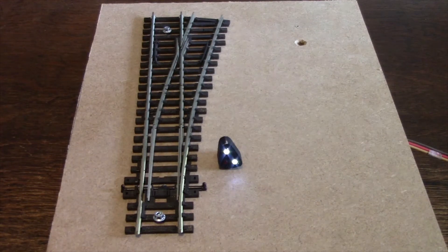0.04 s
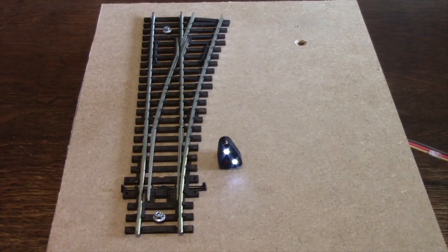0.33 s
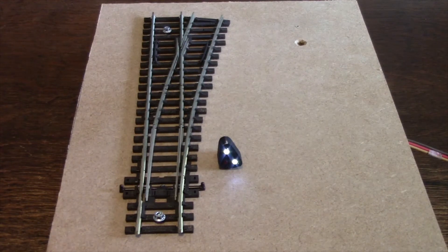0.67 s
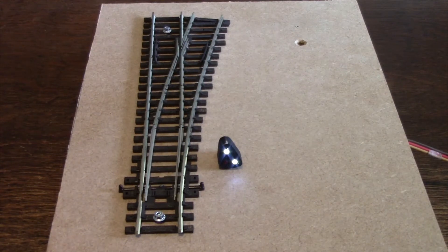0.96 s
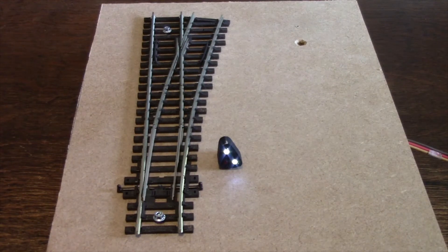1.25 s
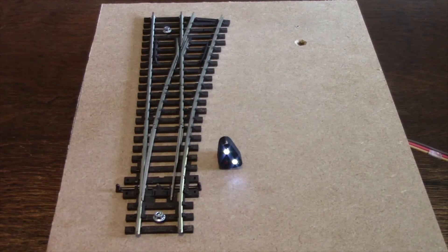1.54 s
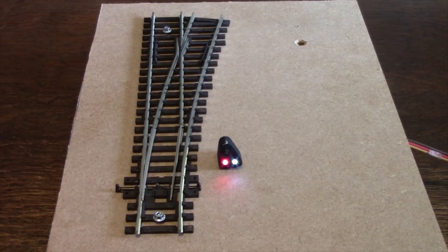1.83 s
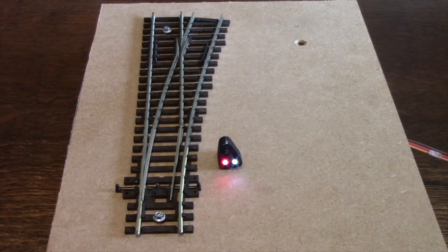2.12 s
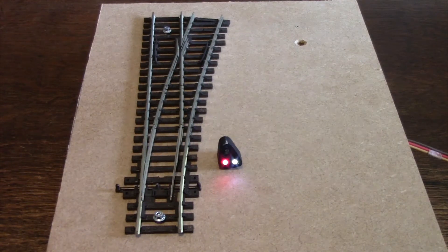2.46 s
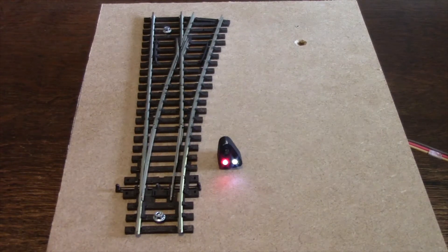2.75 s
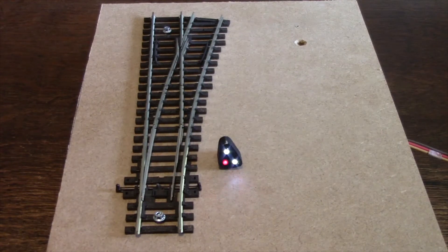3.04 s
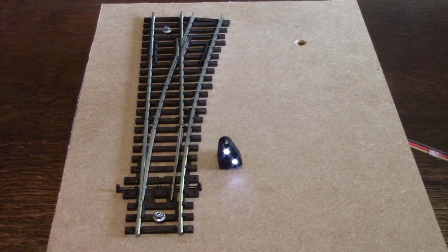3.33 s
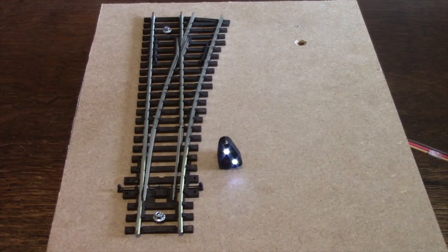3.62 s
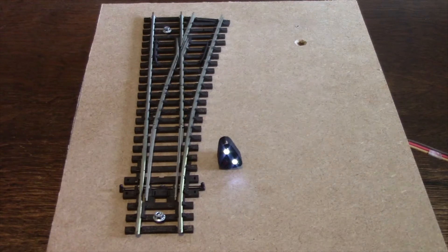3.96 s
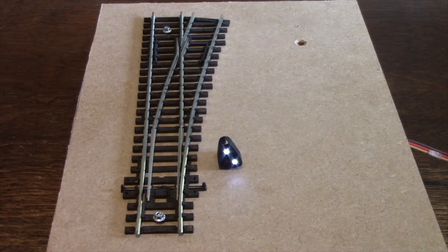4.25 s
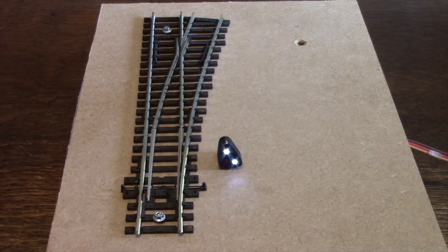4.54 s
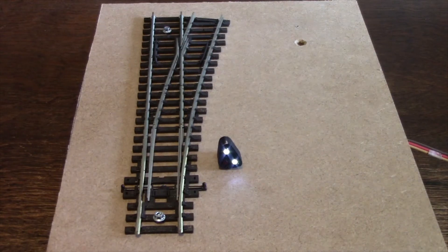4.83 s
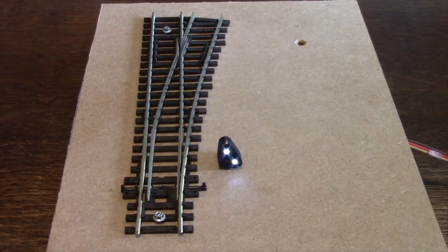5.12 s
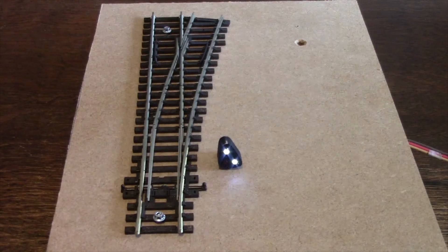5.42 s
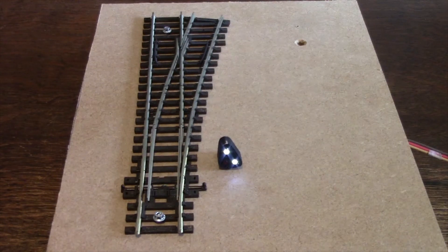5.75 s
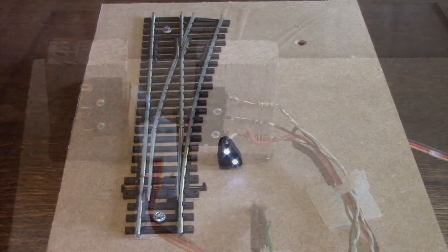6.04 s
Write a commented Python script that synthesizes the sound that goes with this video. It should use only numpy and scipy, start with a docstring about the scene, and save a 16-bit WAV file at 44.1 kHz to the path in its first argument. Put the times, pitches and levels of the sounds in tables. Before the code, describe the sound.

In a quiet, faintly humming room, a little servo motor starts a fine, rattling gear whirr close to the microphone, sliding a model track point over. Two bright microswitch clicks mark the trip. The buzz turns more even as the motor stalls, then limps on again for the return, with a brief rail scrape and two more clicks. It stops, leaving small gear twitches, one soft baseboard tick and faint camera lens chirps.

```python
"""A small servo, close to a stereo pair of microphones, creeps a model railway point across, strains
against its end stop, then creeps back. Its motor is kicked once per control frame, about 42 times a
second, so the gears strike and ring the case; two microswitches snap over on each trip. The baseboard
nods as the arm sets off and later ticks once. Close by, a camera's lens drive chirps now and then;
behind it all lie the rumble and hum of a quiet room."""
import sys
import numpy as np
from scipy import signal
from scipy.fft import rfft, irfft
from scipy.io import wavfile
from scipy.ndimage import uniform_filter1d

SR = 44100
rng = np.random.default_rng(int(sys.argv[2]) if len(sys.argv) > 2 else 0)


def to_wav(sig):
    """Store sig (one row per channel, or 1-D mono) as 16-bit WAV at the path in sys.argv[1].

    Samples outside -1..1 are clipped; the rate is SR.
    """
    pcm = np.clip(np.atleast_2d(sig), -1, 1) * 32767
    pcm = np.round(pcm).astype(np.int16)
    wavfile.write(sys.argv[1], SR, pcm.T)  # frames by channels


N = 268216
WINDUP_SAMPLES = 132  # the gears take up their slack for this long before they strike

# the arm's three moves: (start [s], end [s], travel [about -1 outward, 0 at the stop, 1 back],
# relative pulse level [dB], rubbing level [dB], extra push of a command step [dB])
MOVES = [(0.414, 1.608, -1.1, -35, -53.5, 4), (1.804, 2.94, -0.14, -31, -70, 0),
         (2.98, 4.296, 0.93, -33, -54.5, 1.5)]
# resonances of the servo's case and gears:
# (frequency [Hz], width [Hz], gain outward [dB], gain stalled [dB], gain back [dB])
CASE_MODES = [(1550, 156, -14, -16.5, -16), (2007, 175, -10, -9, -12), (2594, 360, -9, -7.5, -12.5),
              (3085, 125, 4, 5.5, 4), (3660, 220, -5, -24, 1), (3880, 180, -9.5, -4, -5.5),
              (4380, 56, -11, -7, -13), (4764, 68, -8.5, -14, -7.5), (5586, 470, -12, -10.5, -8),
              (6600, 295, -7, -13.5, -4), (7250, 260, -15, -17, -25), (7900, 120, -21, -16, -16),
              (8390, 700, -16, -15, -13), (9320, 270, -19.5, -14.5, -17.5), (9900, 430, -36, -20.5, -20),
              (11520, 500, -25, -31, -21.5), (12600, 540, -24, -27, -21.5), (14800, 1000, -39, -37, -34)]
# resonances of each switch and its mount: (frequency [Hz], width [Hz], gain outward [dB], gain back [dB])
SWITCH_MODES = [
    [(1180, 250, -1, -5), (1800, 80, 7, 4), (2320, 130, 17, 11.5), (3095, 240, 18.5, 12),
     (3350, 190, 10, 17.5), (4550, 240, -7, 1), (5700, 400, -1, 7.5), (6720, 400, 11.5, 6.5),
     (7800, 240, 10, 10), (8130, 160, 20.5, 14.5), (8700, 250, 17, 14), (9560, 340, 19, 13),
     (10900, 280, -11, 7.5), (13540, 390, 5, -3), (15700, 430, 3, -3)],
    [(1210, 260, 0, -2.5), (1584, 380, 8, 7), (2010, 58, -9, 16), (2690, 220, 21, 7), (3960, 110, 12.5, 11),
     (4280, 110, 10, 9), (5640, 510, 10.5, 8), (6630, 250, 19.5, -3), (7700, 350, 8, 1),
     (8400, 250, 12, 10), (9570, 250, 5, 15), (10720, 310, 8, 11.5), (11970, 260, 11, 14),
     (13650, 370, 6, 9), (14400, 370, 12, 8)],
]


def servo(pulse_db=-3, catch_db=-2.0, follow_db=2.5, uneven_db=3, step_frames=4,
          bite_db=6.5, bite_frames=0.83):
    """One motor kick per control frame: limping while the gears turn, more even while they are stalled."""
    # the gears catch hard: (time [s], relative level [dB], pitch rung most [Hz])
    catches = [(0.4564, -33, 3060), (0.7337, -29, 3080), (0.828, -27.5, 2930), (0.9206, -27.5, 3260),
               (.991, -31.5, 6600), (1.0143, -29.5, 6600), (1.1311, -28, 3000), (1.4382, -32.5, 3080),
               (1.578, -29.5, 3200), (1.6968, -30, 3080), (2.9768, -30, 3780), (3.2371, -30.5, 3700),
               (3.448, -29, 3470), (3.7052, -28, 3630), (3.8674, -29.5, 3700), (3.914, -28.5, 3700),
               (4.0066, -30, 3670), (4.1694, -28, 3800)]
    # frames with the arm already in place and no pulse: (time [s])
    rests = [.503, .665, .805, 1.108, 1.461, 1.674, 2.954, 3.355]
    same_teeth, out = rattle(0.00328, 5.9), np.zeros(N)
    since_catch, bite_hz = 1, 0
    for s in frame_times():
        since_catch += 1
        travel, db, _, step_db = arm_motion(s)
        turning = np.clip(abs(travel), .08, 1)
        db += pulse_db + step_db * (since_catch % step_frames == 0)  # the commanded position steps on
        db += turning * (follow_db * (since_catch == 1) + uneven_db * (2 * rng.random() - 1))
        for at, hard_db, hz in catches:
            if abs(at - s) < .01:
                s, db, bite_hz, since_catch = at, hard_db + catch_db, hz, 0
        impacts = (1 - turning) * same_teeth + turning * rattle(0.00311, 7.05)
        lift_db = bite_db * np.exp(-since_catch / bite_frames)  # the caught tooth stays in mesh briefly
        pulse = gear_pulse(impacts, np.clip(travel, -1, 1), bite_hz, lift_db)
        if np.min(abs(s - np.array(rests))) > .01:
            add(out, s - WINDUP_SAMPLES / SR, blow(pulse, db))
    return out


def frame_times():
    """The start of each control frame in seconds; the frames slow down as the arm takes load."""
    # (time [s], frame rate [Hz])
    frame_rate = [(.41, 43.33), (1.737, 42.155), (2.915, 42.155), (4.3, 43.54)]
    s, rate = np.transpose(frame_rate)
    t = np.arange(s[0], s[-1], 1 / SR)
    frames = np.floor(np.cumsum(np.interp(t, s, rate)) / SR - .003)
    return t[1:][np.diff(frames) > 0]


def arm_motion(s):
    """Travel, pulse level, rubbing and step push at time s: steady within a move, blending in between."""
    moves = np.array(MOVES)
    return [np.interp(s, moves[:, :2].ravel(), np.repeat(column, 2)) for column in moves.T[2:]]


def gear_pulse(impacts, travel, bite_hz, bite_db, bite_width_hz=730,
               windup_db=-9, windup_s=0.0061, vary_db=3):
    """The gears scrape as the motor takes up their slack, then strike and ring the case."""
    swell = np.exp(np.arange(-WINDUP_SAMPLES, 0) / SR / windup_s)
    scrape = rng.standard_normal(WINDUP_SAMPLES) * swell
    slack = .5 + .5 * abs(travel)  # stalled gears stay pressed together
    drive = np.r_[slack * amp(windup_db) * scrape / np.linalg.norm(scrape), impacts]
    modes = []
    for f, width, *levels in CASE_MODES:
        db = np.interp(travel, [-1, 0, 1], levels)  # each direction loads the other flank of the teeth
        db += vary_db * travel * rng.standard_normal()  # each new tooth colours the blow
        db += bite_db * np.exp(-((f - bite_hz) / bite_width_hz) ** 2)
        modes.append((f, width, db))
    return ring(drive, modes)


def gear_whirr(grain_db=3, grain_s=0.0018, fade_db_per_s=700):
    """The motor coasts and the teeth rub with a fine grit, which dies away when the arm is parked."""
    # spectrum of the rubbing: (frequency [Hz], relative density [dB])
    rub_colour = [(500, -9), (1300, -5.5), (2100, -8.5), (3300, 1), (4200, -2.5), (5200, -3.5),
                  (6600, -7.5), (8500, -10), (11000, -11), (16000, -25)]
    # the rails scrape as they slide back: (time [s], half length [s], extra rubbing [dB])
    rail_scrape = (3.28, 0.048, 9.2)
    at, half_length, scrape_db = rail_scrape
    t = np.arange(N) / SR
    _, _, rub_db, _ = arm_motion(t)
    parked_s = np.maximum(MOVES[0][0] - t, 0) + np.maximum(t - MOVES[-1][1], 0)
    db = rub_db + scrape_db * np.exp(-((t - at) / half_length) ** 2) - fade_db_per_s * parked_s
    grit = unit(uniform_filter1d(rng.standard_normal(N), int(grain_s * SR)))
    rub = rng.standard_normal(N) * amp(grain_db * grit)
    colour = amp(curve(rub_colour, np.fft.rfftfreq(N, 1 / SR)))
    return amp(db) * unit(irfft(rfft(rub) * colour, N))


def twitches(gain_db=-1.5):
    """Stray pulses jerk the gears of the parked servo."""
    # (time [s], relative level [dB])
    stray_pulses = [(4.6745, -31.5), (6.034, -36), (6.056, -33.5), (6.0787, -34.5)]
    out = np.zeros(N)
    for s, db in stray_pulses:
        jerk = gear_pulse(rattle(0.00345, 6.6), travel=0.73, bite_hz=3900, bite_db=2)
        add(out, s - WINDUP_SAMPLES / SR, blow(jerk, db + gain_db))
    return out


def microswitches(gain_db=-3):
    """A spring blade snaps over and bounces on its contact for a few milliseconds."""
    # a faint bright tick just after a lens chirp, then the four snaps:
    # (time [s], relative level [dB], switch [0 or 1], stroke [0 outward, 1 back])
    snaps = [(0.416, -37, 1, 1), (0.5753, -9, 0, 0), (1.6526, -14, 1, 0), (3.0834, -16.5, 1, 1),
             (4.1799, -11, 0, 1)]
    out = np.zeros(N)
    for s, db, switch, stroke in snaps:
        modes = [(f, width, gains[round(stroke)]) for f, width, *gains in SWITCH_MODES[round(switch)]]
        add(out, s, blow(ring(rattle(.0033, 6), modes), db + gain_db))
    return out


def lens_drive(note_db=2.5, knock_db=-2.5, fade_db=11, between_db=-9, jitter_s=2e-5):
    """Fading motor steps ring one high note and knock the barrel, hardest at the start and stop."""
    # (time [s], relative level [dB])
    chirps = [(.043, -39.5), (.158, -39.5), (.389, -36), (.462, -41.5), (1.083, -38), (1.273, -38),
              (1.485, -44.5), (2.552, -39), (4.31, -38.5), (4.653, -41), (4.766, -39), (4.882, -39.5),
              (5.904, -46), (6.033, -38.5)]
    # motor steps in one chirp, slowing at the end: (delay [s])
    step_delays = [0, .004005, .007185, .010365, .01402, .01849, .02309]
    # the note each step rings: (frequency [Hz], width [Hz], gain [dB])
    motor_note = [(8560, 420, 0)]
    # resonances of the lens barrel: (frequency [Hz], width [Hz], gain [dB])
    barrel_modes = [(6070, 300, -3), (7150, 700, -14), (9000, 480, 2), (9730, 600, -4), (10400, 500, -4),
                    (11460, 400, -6), (12800, 780, -14)]
    notes, barrel = np.zeros((2, N))
    for s, db in chirps:
        steps, knocks = np.zeros((2, SR // 20))
        for delay in step_delays:
            step_s = abs(delay + jitter_s * rng.standard_normal())
            step_db = -fade_db * (delay / step_delays[-1]) ** 2 + rng.standard_normal()
            add(steps, step_s, amp([step_db]))
            at_end = delay in (step_delays[0], step_delays[-1])
            add(knocks, delay, rattle(0.0038, 6.4) * (1 if at_end else amp(between_db)))
        add(notes, s, blow(ring(steps, motor_note), db + note_db))
        add(barrel, s, blow(ring(knocks, barrel_modes), db + knock_db))
    return notes, barrel


def board_nods(rise_s=0.023):
    """The baseboard nods as the arm sets off: low thuds that swell and fade within a few cycles."""
    # (time [s], peak level [dB], frequency [Hz])
    nods = [(0.429, -46.5, 123), (2.975, -48, 111)]
    out, t = np.zeros(N), np.arange(SR // 4) / SR
    swell = t / rise_s * np.exp(1 - t / rise_s)
    for s, db, hz in nods:
        add(out, s, amp(db) * swell * np.sin(2 * np.pi * hz * t))
    return out


def board_tick():
    """One soft tick from the baseboard, with a short woody ring."""
    # (time [s], level [dB])
    tick = (5.634, -37)
    # resonances of the board: (frequency [Hz], width [Hz], gain [dB])
    board_modes = [(1770, 78, 6.5), (2050, 120, -9), (2930, 380, -16), (4000, 760, -22), (5500, 830, -23)]
    s, db = tick
    out = np.zeros(N)
    add(out, s, blow(ring(rattle(0.0043, 4.1), board_modes), db))
    return out


def off_axis(x, modes, knee_db, evenness, dull_hz):
    """A body beams its strongest resonances at the microphones; the room gets a flatter, duller sound."""
    hz = np.fft.rfftfreq(N, 1 / SR)
    peaks = sum(amp(max(levels)) ** 2 / (1 + ((hz - f) / width) ** 2) ** 2 for f, width, *levels in modes)
    beaming = (1 + peaks / amp(knee_db) ** 2) ** (evenness / 2)
    treble_loss = np.sqrt(1 + (hz / dull_hz) ** 4)
    return irfft(rfft(x) / beaming / treble_loss, N)


def reflections(x, spread=0.019, onset_s=0.0018):
    """Dense reflections from table and walls, almost mono, each band dying at its own speed."""
    # (frequency [Hz], time to fall 60 dB [s])
    decay_times = [(500, 0.59), (1500, 0.3), (3500, 0.32), (9000, 0.2), (15000, 0.092)]
    taps = rng.standard_normal((2, SR // 2)) * (rng.random((2, SR // 2)) < .12)
    hz, t, bands = signal.stft(taps, SR, nperseg=256)
    decay = amp(-60 * t / curve(decay_times, hz)[:, None])
    tail = signal.istft(bands * decay, SR, nperseg=256)[1]
    tail *= np.minimum(np.arange(tail.shape[1]) / SR / onset_s, 1) ** 2
    mid, side = signal.fftconvolve(x[None], tail / np.linalg.norm(tail[0]), axes=1)[:, :N]
    return np.array([mid + spread * side, mid - spread * side])


def room_tone(noise_db=-48.7, whistle_hz=9885, whistle_db=-76, whistle_wander_hz=8.8):
    """Rumble and hiss partly shared by the microphones, wavering hums and a thin electronic whistle."""
    # (frequency [Hz], relative density [dB])
    room_colour = [(15, -12), (27, -3.5), (50, -9), (80, -9), (115, -4), (195, -5), (265, -1), (400, -7),
                   (650, -9), (1000, -13), (2000, -19.5), (4000, -25), (9000, -29.5), (16000, -36)]
    # (frequency [Hz], left-right correlation [0-1])
    likeness = [(40, 0.3), (100, 0.27), (180, 0.58), (300, 0.51), (700, 0.38), (2000, 0.77), (8000, 0.59)]
    # (frequency [Hz], level [dB], wander [Hz])
    hums = [(102.6, -71, 1.1), (122, -65.5, 2.38), (259, -59.5, 6.88), (303, -64, 3.13),
            (554.6, -67.5, 0.94), (830.4, -69, 1.12), (1103, -67, 1.1)]
    hz = np.fft.rfftfreq(N, 1 / SR)
    left, other = rfft(rng.standard_normal((2, N)))
    same = np.clip(curve(likeness, hz), 0, 1)
    pair = np.array([left, same * left + np.sqrt(1 - same ** 2) * other])
    out = amp(noise_db) * unit(irfft(pair * amp(curve(room_colour, hz)), N))
    for f, db, wander in hums + [(whistle_hz, whistle_db, whistle_wander_hz)]:
        drift = unit(irfft(rfft(rng.standard_normal(N)) * (hz < 8), N))
        out += amp(db) * unit(np.sin(2 * np.pi * np.cumsum(f + wander * drift) / SR))
    return out


def rattle(length_s, fall_db, size=1024, passes=6):
    """A tight cluster of tiny impacts that dies away, with equal energy at all frequencies."""
    t = np.arange(size) / SR
    envelope = amp(-fall_db * (t / length_s) ** 2)
    burst = rng.standard_normal(size)
    for _ in range(passes):
        spectrum = rfft(burst * envelope)
        burst = irfft(spectrum / (abs(spectrum) + 1e-12))
    return burst


def ring(drive, modes, size=4096):
    """A drive rings a body's resonances (minimum phase, steep skirts, bass cut below 500 Hz)."""
    hz = np.fft.rfftfreq(size, 1 / SR)
    power = sum(amp(db) ** 2 / (1 + ((hz - f) / (0.56 * width)) ** 2) ** 1.23 for f, width, db in modes)
    log_gain = np.log(power * hz ** 2 / (hz ** 2 + 500 ** 2) + 1e-9) / 2
    phase = -signal.hilbert(np.r_[log_gain, log_gain[-2:0:-1]]).imag[:len(hz)]
    return irfft(rfft(drive, size) * np.exp(log_gain + 1j * phase))


def blow(sound, db):
    """Scales a short sound so that its energy, packed into 3 ms, has the level db."""
    return amp(db) * sound * np.sqrt(.003 * SR / np.sum(sound ** 2))


def curve(points, hz):
    """Points joined by straight lines on a log-frequency axis."""
    f, value = np.transpose(points)
    return np.interp(np.log(hz + 1), np.log(f), value)


def add(mix, s, sound):
    part = mix[round(s * SR):][:len(sound)]
    part += sound[:len(part)]


def amp(db):
    return 10 ** (np.asarray(db) / 20)


def unit(x):
    return x / np.sqrt(np.mean(x ** 2) + 1e-20)


def scene(servo_wet_db=-7.0, switch_wet_db=-7, note_wet_db=-15, knock_wet_db=-4):
    """The close sources up front, their weak reflections and the room tone behind."""
    motor = servo() + twitches()
    snaps = microswitches()
    notes, knocks = lens_drive()
    both_switches = [*SWITCH_MODES[0], *SWITCH_MODES[1]]
    sent = amp(servo_wet_db) * off_axis(motor, CASE_MODES, knee_db=-6.5, evenness=0.75, dull_hz=8050)
    sent += amp(switch_wet_db) * off_axis(snaps, both_switches, knee_db=10.5, evenness=0.86, dull_hz=11100)
    sent += amp(note_wet_db) * notes + amp(knock_wet_db) * knocks
    direct = motor + gear_whirr() + snaps + notes + knocks + board_tick() + board_nods()
    return direct + reflections(sent) + room_tone()


def record(dry, lag_s=4e-6, edge_hz=15900):
    """Sound reaches the right microphone a hair later and louder; the top treble is cut off."""
    right = irfft(rfft(dry[1]) * np.exp(-2j * np.pi * np.fft.rfftfreq(N, 1 / SR) * lag_s), N)
    pair = np.array([dry[0], right]) * amp([[-.2], [.2]])
    lowpass = signal.firwin(511, edge_hz, window=("kaiser", 9), fs=SR)
    return signal.oaconvolve(pair, lowpass[None], "same")


dry = scene()
out = record(dry)
to_wav(out)
```